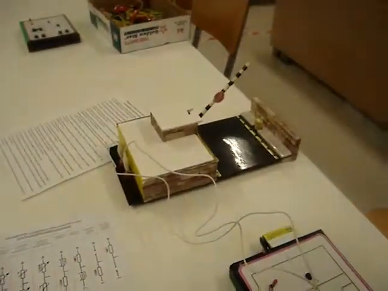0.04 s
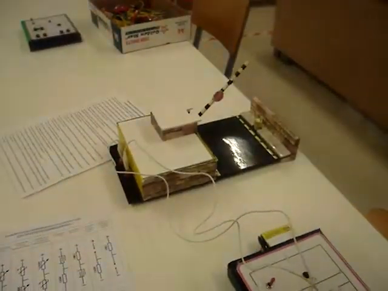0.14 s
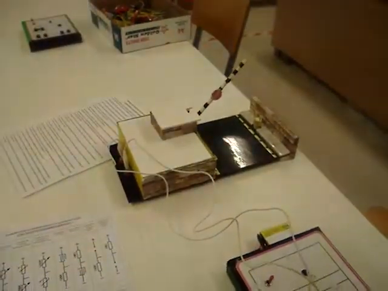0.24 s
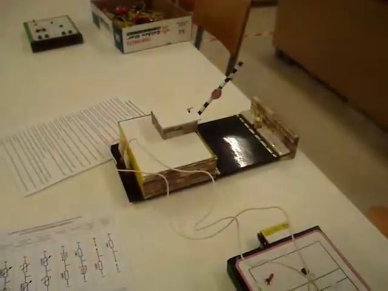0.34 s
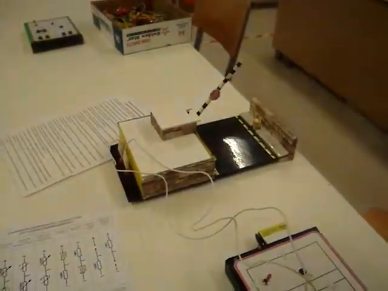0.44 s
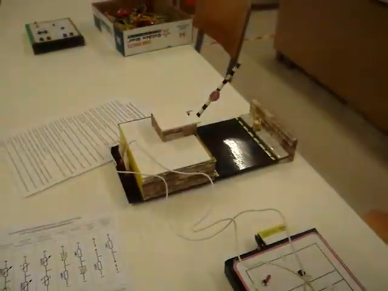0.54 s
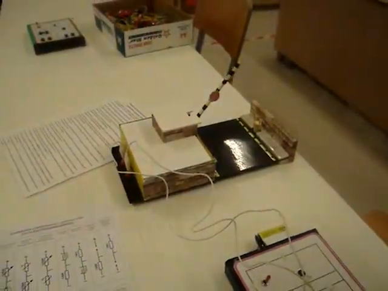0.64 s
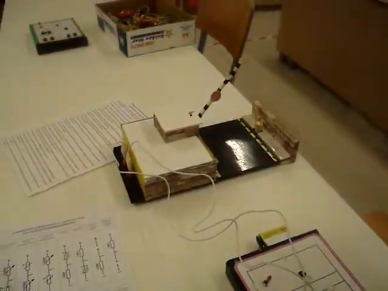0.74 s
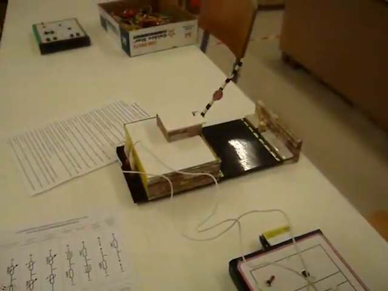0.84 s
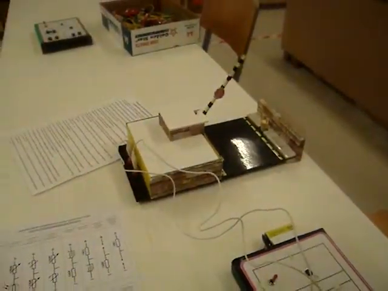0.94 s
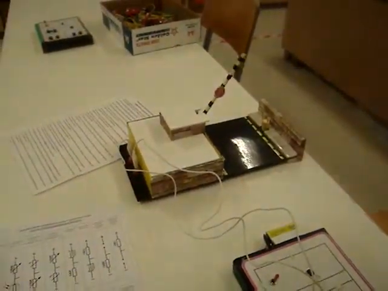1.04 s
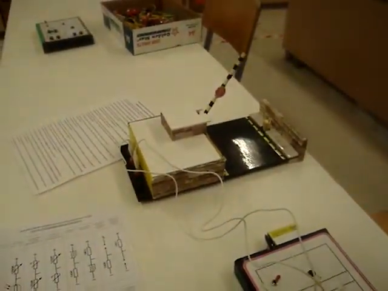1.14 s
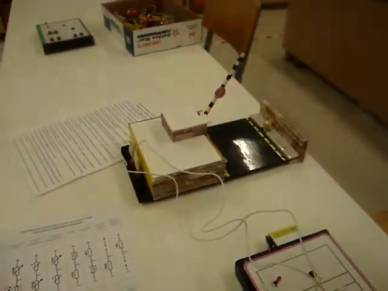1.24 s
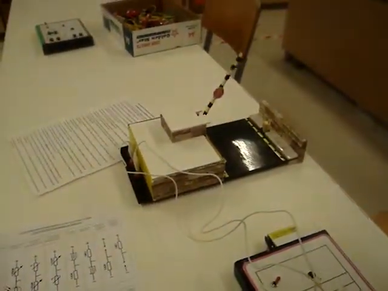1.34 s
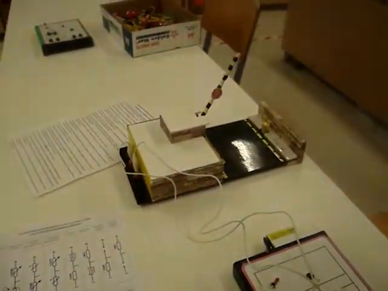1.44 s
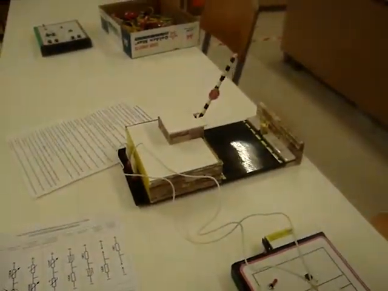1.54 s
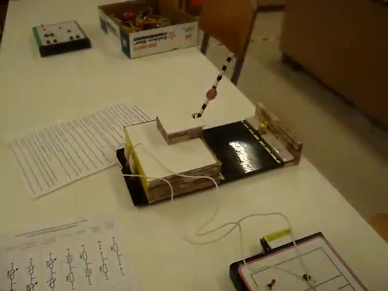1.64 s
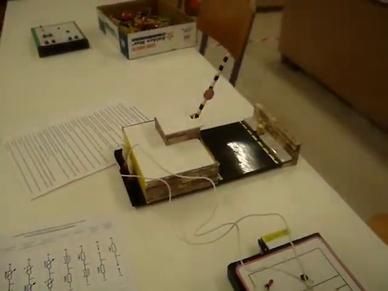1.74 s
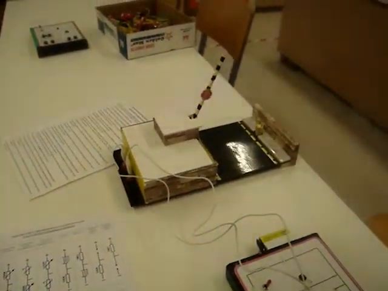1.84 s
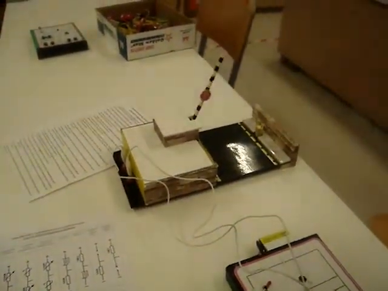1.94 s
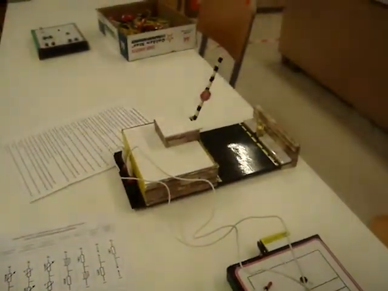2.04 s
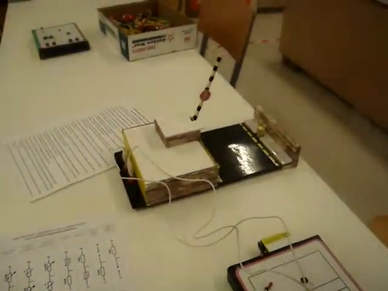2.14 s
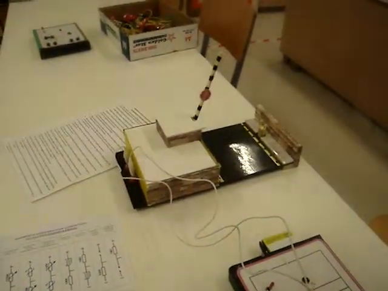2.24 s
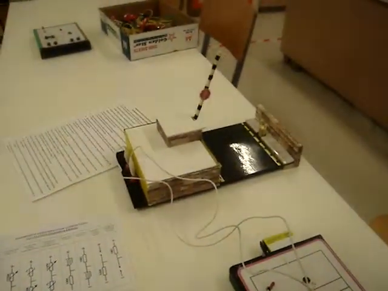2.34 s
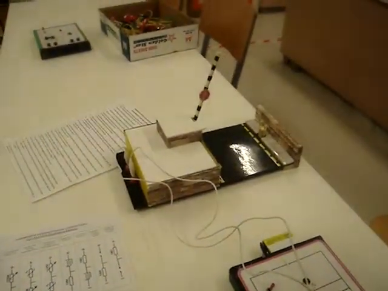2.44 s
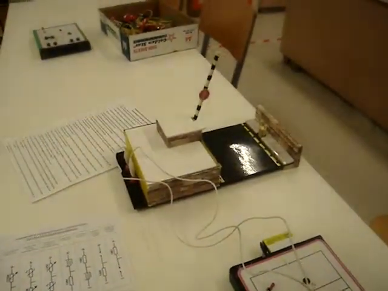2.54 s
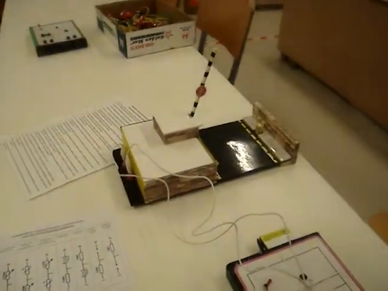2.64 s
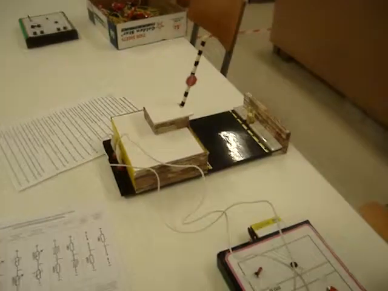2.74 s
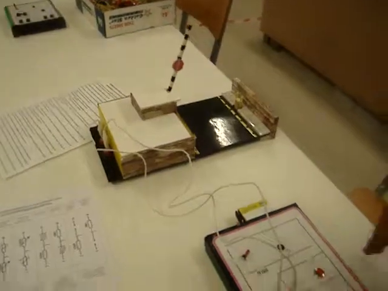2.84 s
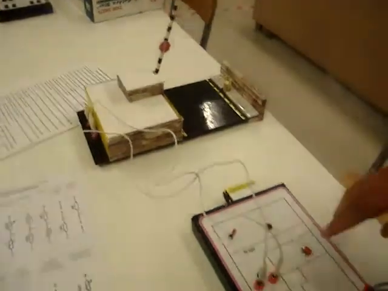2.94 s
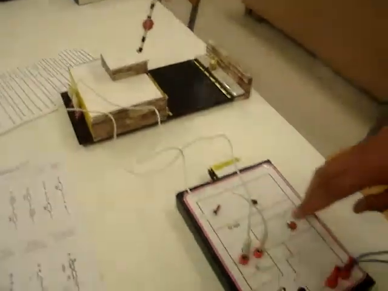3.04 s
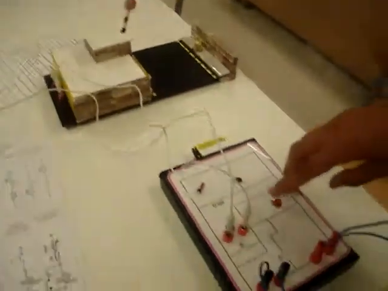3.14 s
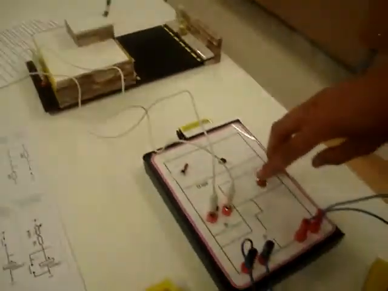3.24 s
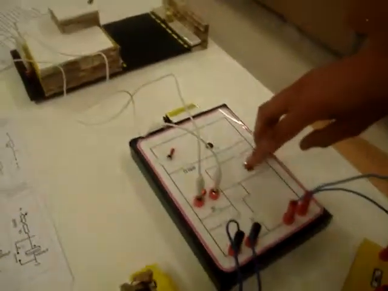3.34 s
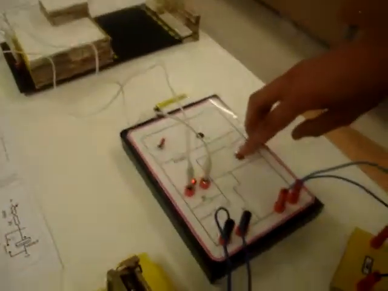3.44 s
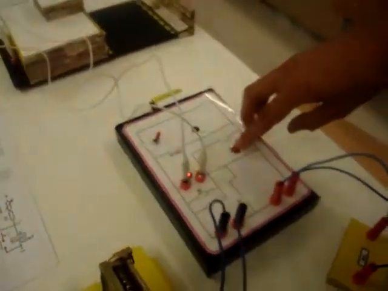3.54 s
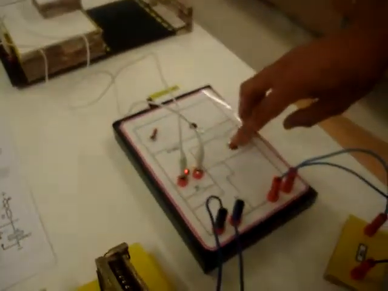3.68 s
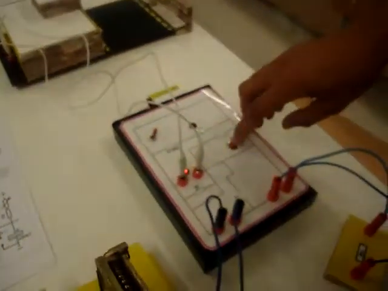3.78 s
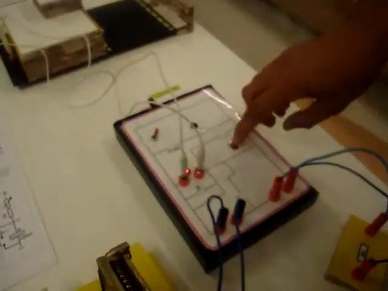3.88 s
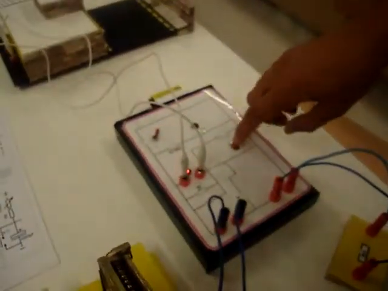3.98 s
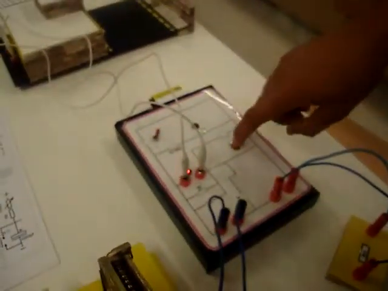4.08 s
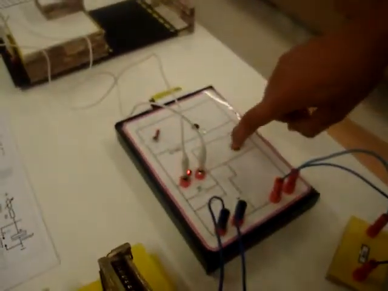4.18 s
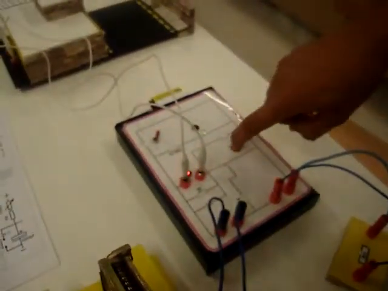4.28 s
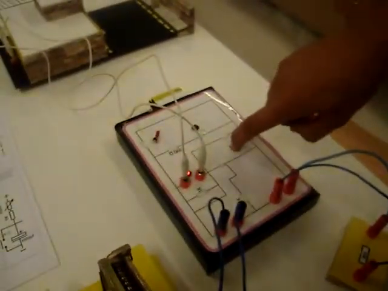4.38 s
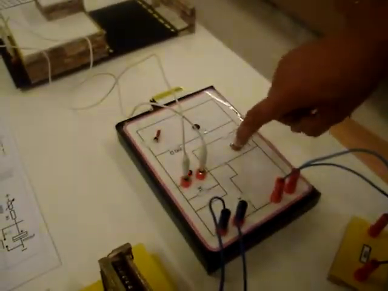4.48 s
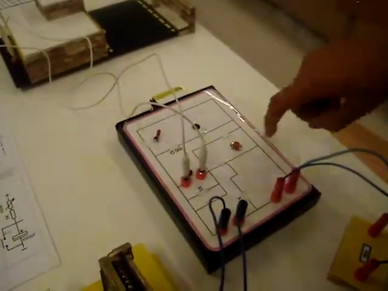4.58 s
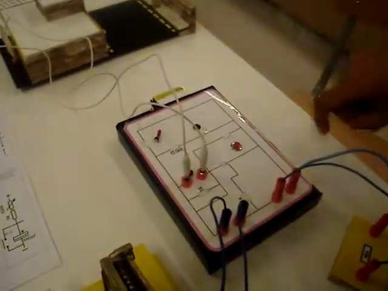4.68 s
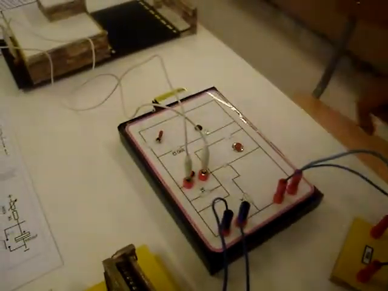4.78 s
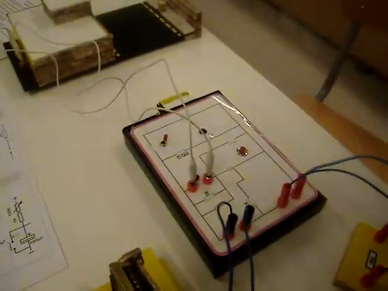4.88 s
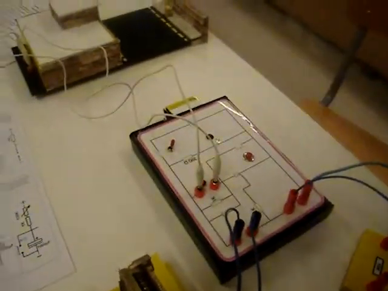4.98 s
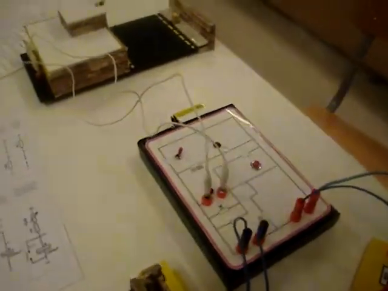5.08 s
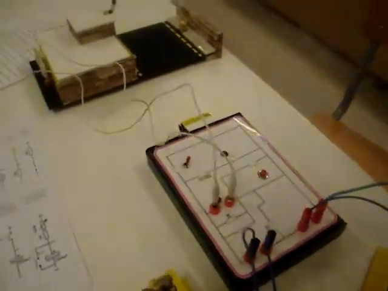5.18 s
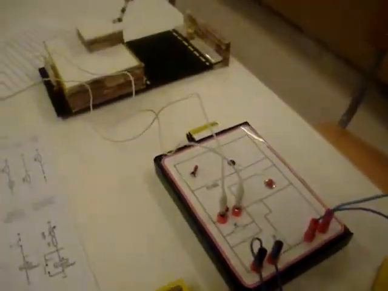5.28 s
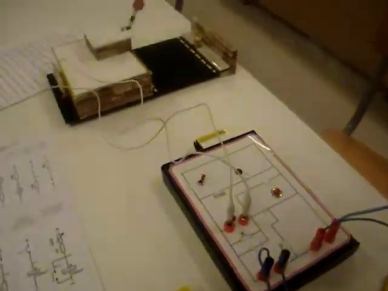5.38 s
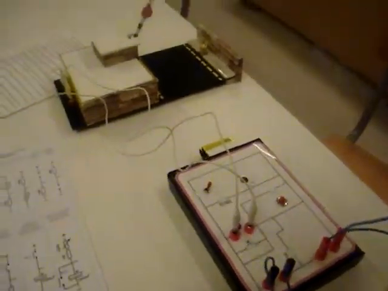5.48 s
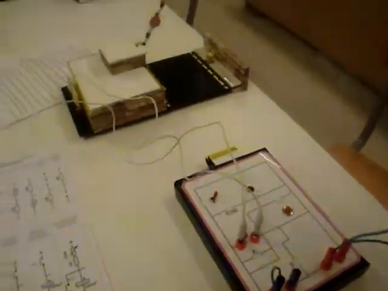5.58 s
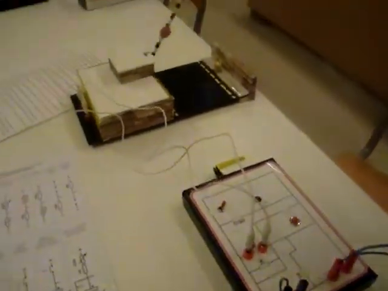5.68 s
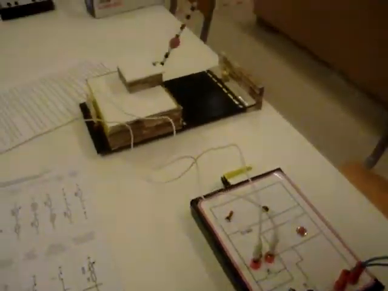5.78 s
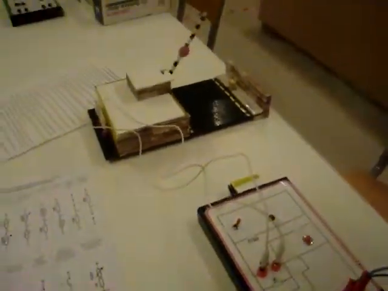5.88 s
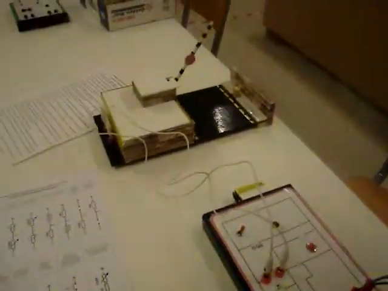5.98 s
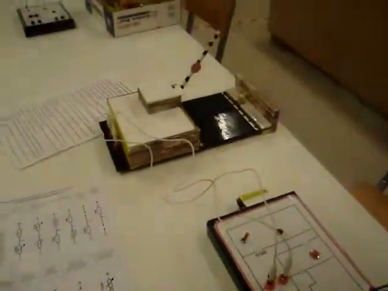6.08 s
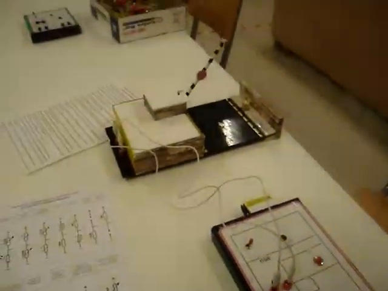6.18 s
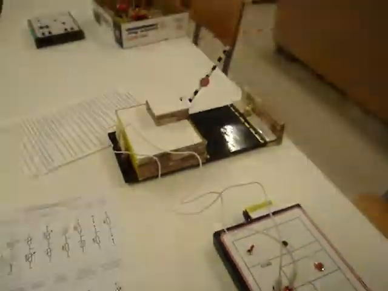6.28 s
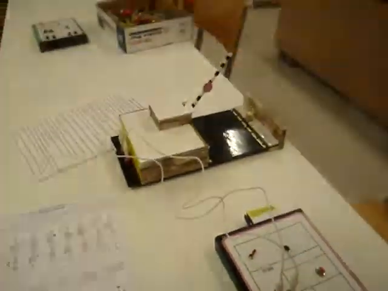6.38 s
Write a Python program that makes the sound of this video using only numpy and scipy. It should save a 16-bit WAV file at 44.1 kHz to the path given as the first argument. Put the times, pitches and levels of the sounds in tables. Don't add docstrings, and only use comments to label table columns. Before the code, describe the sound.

From 0 s a small geared motor is already running close by: a gritty, rapid whirr, rattling about a hundred times a second, with a thin clean whine and hard irregular tooth clicks. From about 1.5 to 2.1 s it labours, dipping slightly in pitch as clicks crowd together; faint low case bumps occur at 1.5 and 2.2 s. At 2.4 s power goes and it coasts down, silent by 2.7 s. Quiet ventilation, mains hum and a soft airy whistle remain. A sleeve rustles at 2.8 s and 3.6 s, with small ticks around 3 s. Soft fingertip taps begin at 4.03 s; a relay chatters and clacks twice around 4.2 s, echoing in the classroom. At 4.55 s it chatters and clacks again, and the motor spins up quickly, whirring with slight brush hiss, a bright tick near 4.96 s and sparser tooth clicks until cut off around 6.4 s.

```python
import sys
import numpy as np
from scipy import signal
from scipy.fft import rfft, irfft
from scipy.io import wavfile
from scipy.ndimage import minimum_filter1d

SR = 44100
rng = np.random.default_rng(int(sys.argv[2]) if len(sys.argv) > 2 else 0)


def to_wav(sig):
    pcm = np.clip(np.atleast_2d(sig), -1, 1) * 32767
    pcm = np.round(pcm).astype(np.int16)
    wavfile.write(sys.argv[1], SR, pcm.T)


def rack_gain(trim_db):
    fader = np.asarray(trim_db, float)
    return 10 ** (fader / 20)


N = 283122

FREE_SPEED = 98.0425
REVERSED_S = 3.5

# [t/s, peak level/dB]
BLOWS = [(0.0667, -15.5), (0.2593, -16.5), (0.3616, -14), (0.4733, -14.5), (0.625, -14.5), (0.8649, -12.5),
         (0.9787, -12), (1.3703, -13.5), (1.4207, -11.5), (1.6237, -14.5), (1.7399, -16.5), (1.8033, -19.5),
         (1.8332, -13.5), (1.9001, -16), (1.943, -11), (1.9759, -18.5), (1.9959, -30.5), (2.0492, -20),
         (2.0996, -19.5), (2.1415, -17.5), (2.2014, -10), (2.3491, -14.5), (4.729, -21), (4.9221, -16.5),
         (4.9899, -18), (5.4589, -27.5), (5.5222, -18), (6.1553, -17.5), (6.1892, -17.5), (6.3299, -16)]


def rms_one(x):
    return x / np.sqrt(np.mean(x ** 2) + 1e-20)


def in_time(rows):
    s, *columns = np.transpose(rows)
    return [np.interp(np.arange(N) / SR, s, c) for c in columns]


def band(x, low_hz, high_hz, order=2):
    return signal.sosfilt(signal.butter(order, [low_hz, high_hz], "band", fs=SR, output="sos"), x)


def resonances(x, modes):
    out = 0
    for k, (hz, width_hz, db) in enumerate(modes):
        r = np.exp(-np.pi * width_hz / SR)
        a = [1, -2 * r * np.cos(2 * np.pi * hz / SR), r * r]
        out = out + (-1) ** k * rack_gain(db) * signal.lfilter([(1 - r * r) / 2, 0, (r * r - 1) / 2], a, x)
    return out


def drift(rate_hz):
    r = np.exp(-2 * np.pi * rate_hz / SR)
    return rms_one(signal.lfilter([1], [1, -2 * r, r * r], rng.standard_normal(N + SR))[SR:])


def add(out, s, sound):
    i = round(s * SR)
    out[i:i + len(sound)] += sound[:N - i]


def speed_curve():
    # [t/s, speed/turns per s]
    lift_speed = [(0, 98.92), (1.2, 99.07), (1.55, 99.47), (1.65, 95.63), (1.8, 93.08), (1.95, 93.12),
                  (2.1, 97.63), (2.42, 94.45)]
    coast_loss = 370
    restart_s, rotor_s, arm_s, arm_shortfall = 4.55, .05936, .41024, 10.893
    t = np.arange(N) / SR
    coasting = np.maximum(t - lift_speed[-1][0], 0)
    lift = np.maximum(in_time(lift_speed)[0] - coast_loss * coasting, 0)
    since = np.maximum(t - restart_s, 0)
    lower = FREE_SPEED - arm_shortfall * np.exp(-since / arm_s)
    lower -= (FREE_SPEED - arm_shortfall) * np.exp(-since / rotor_s)
    return np.where(t > REVERSED_S, lower, lift)


def shaft():
    lowering, speed = np.arange(N) > REVERSED_S * SR, speed_curve()
    lift_turns = .11 + np.cumsum(speed) / SR
    lower_turns = 285.874 + np.cumsum(speed * lowering) / SR
    return np.where(lowering, lower_turns, lift_turns), lowering


def drive_curves():
    # [t/s, rattle level/dB, share of rattle bunched once a turn/0-1]
    gear_load = [
        [(0, -27.5, 0.3), (1.1, -28.5, 0.37), (1.5, -29, 0.49), (2, -30.5, 0.46), (2.22, -28, 0.39),
         (2.38, -31, .5), (2.5, -37, .6), (2.62, -54.5, 1)],
        [(4.562, -42, .2), (4.605, -39, .25), (4.635, -36.5, .5), (4.68, -32.5, 0.36), (4.9, -29, 0.34),
         (5.3, -30.5, 0.36), (6.42, -29.5, 0.26)],
    ]
    lift, lower = gear_load
    rest = [(lift[-1][0] + 0.097, -90, lift[-1][2]), (lower[0][0] - .02, -90, lower[0][2])]
    level_db, bunched = in_time(list(lift) + rest + list(lower))
    slow = 1 - speed_curve() / FREE_SPEED
    box_db, lid_db, shell_db = -3.5 - 3 * slow, -5.5 + 6.5 * slow, -9.5 - 13.5 * slow
    return level_db, box_db, lid_db, shell_db, bunched


def runout_db(turn):
    labours_s, laboured_share = 1.55, 0.35
    count = np.arange(turn[-1] + 1)
    laboured = (count > turn[round(labours_s * SR)]) & (count <= turn[round(REVERSED_S * SR) - 1])
    depth_db = 3 * np.where(laboured, laboured_share, 1)
    return depth_db * np.cos(2 * np.pi * (count - 1.5) / 5)


def rebounds_db(turn):
    slack_db, rebound_db, rebound_turns = -6, 4, 2.5
    blow_turn = turn[(np.array(BLOWS)[:, 0] * SR).astype(int) + 100]
    since = np.arange(turn[-1] + 1)[:, None] - blow_turn
    after = np.where(since > 0, rebound_db * np.exp(-np.maximum(since - 1, 0) / rebound_turns), 0)
    return after.max(axis=1) + slack_db * (since == -1).any(axis=1)


def gears():
    # [f/Hz, width/Hz, level/dB]
    box_modes = [(341, 19.4, -11), (437.7, 38.7, -10), (516, 38, -1.5), (575, 25, 0), (805, 131, -0.5),
                 (902, 253, -1), (1183, 273, -3.5)]
    case_modes = [(2805, 296, -3.5), (3139, 310, 3), (3304, 275, 0.5), (3561, 266, -9), (3822, 156, -8.5),
                  (4480, 780, -17)]
    shell_modes = [(5000, 680, 4), (6320, 590, 8.5), (6840, 616, 8.5), (7820, 2170, -4.5),
                   (9610, 800, -13.5), (10400, 680, -36)]
    lid_modes = [(1601, 69, 3), (1775, 90, 1.5), (2030, 310, -3), (2178, 55, 5), (2366, 320, -2)]
    turns, _ = shaft()
    level_db, box_db, lid_db, shell_db, bunched = drive_curves()
    turn = np.floor(turns + 0.24).astype(int)
    since = turns + 0.23 - turn
    rise_or_fall = np.where(since < .25, .11, .2)
    burst = rms_one(np.exp(-((since - .25) / rise_or_fall) ** 2))

    strength_db = 1.3 * rng.standard_normal((turn[-1] + 1, 3))
    strength_db += (runout_db(turn) + rebounds_db(turn))[:, None]
    strength_db[:, 1] = .8 * strength_db[:, 0] + .5 * strength_db[:, 1]

    bunched = np.clip(bunched, 0, 1)
    noise = rng.standard_normal((4, N))
    crisp = np.clip([bunched + .1, bunched + .25], 0, .95)
    sharp = noise[:2] * (crisp * burst * rack_gain(strength_db[turn, :2].T) + 1 - crisp)
    soft_level = 0.78 * bunched * burst * rack_gain(.5 * strength_db[turn, 2]) + 0.45
    soft = noise[2:] * soft_level * rack_gain(1.35 * drift(27.0))

    case = rms_one(band(resonances(sharp[0], case_modes), 2670, 5350))
    box = rack_gain(box_db) * rms_one(band(resonances(soft[0], box_modes), 321, 2250))
    lid = rack_gain(lid_db) * rms_one(band(resonances(soft[1], lid_modes), 1100, 3030))
    shell = rack_gain(shell_db) * rms_one(band(resonances(sharp[1], shell_modes), 4800, 10000))
    return rack_gain(level_db - 1.5) * (case + box + lid + shell)


def tooth_blows():
    out, push = np.zeros(N), np.exp(-(np.arange(700) / 20.) ** 2)
    for (s, db), chance in zip(BLOWS, rng.uniform(-1.3, 1, (len(BLOWS), 3))):
        case = (3100 + 90 * chance[0], 320, db + 0.35)
        shell = (6500 + 250 * chance[1], 600, db - 11 - 3.5 * chance[2])
        for hz, width_hz, peak_db in (case, shell):
            mode = [(hz, width_hz, 0)]
            ring = resonances(resonances(push * rng.standard_normal(700), mode), mode)
            add(out, s - .0006, rack_gain(peak_db) * ring / np.abs(ring).max())
    return out


def whine():
    shaft_orders = [1, 2, 3, 6, 8, 9, 11, 12, 20, 21, 24, 27, 32, 39]
    # [lifting level/dB, lowering level/dB]
    order_levels = [(-62, -62), (-63, -68), (-63, -66), (-48, -43), (-51, -60), (-46, -60), (-50, -45),
                    (-47, -48), (-49, -55), (-49, -60), (-56, -44), (-50, -54), (-50, -44), (-56, -54)]
    # [t/s, level/dB]
    mesh_tone = [(0, -37), (.78, -36), (.86, -44), (1.4, -45), (1.6, -56), (6.42, -56)]
    # [level speeding up/dB, level at full speed/dB]
    brush_levels = [(-69, -69), (-68, -61), (-69, -63), (-61, -69), (-61, -60), (-68, -66), (-64, -67),
                    (-63, -77), (-65, -82), (-72, -86)]
    turns, lowering = shaft()
    speed = speed_curve()
    powered, settled = np.clip((speed - 80) / 12, 0, 1), np.clip((speed - 95) / 2.5, 0, 1)
    wobble = rack_gain(np.array([1.0 * drift(4), 2.5 * drift(6), 2.5 * drift(9)]))
    strained_db = -6 * np.clip((98.5 - speed) / 2, 0, 1)
    out = rack_gain(in_time(mesh_tone)[0]) * np.sin(20 * np.pi * turns)
    for k, (order, (lift_db, lower_db)) in enumerate(zip(shaft_orders, order_levels)):
        lifting_db = lift_db + strained_db * (order > 3)
        lowering_db = lower_db - 8 * (1 - settled) * (order in (1, 6, 24))
        level = wobble[k % 3] * rack_gain(np.where(lowering, lowering_db, lifting_db))
        out += level * np.sin(2 * np.pi * (order * turns + rng.random()))
    for k, (order, (early_db, late_db)) in enumerate(zip(range(80, 110, 3), brush_levels)):
        level = lowering * wobble[1 + k % 2] * rack_gain(early_db + settled * (late_db - early_db))
        out += wobble[k % 3] * level * np.sin(2 * np.pi * (order * turns + rng.random()))
    return np.sqrt(2) * powered * out


def room_levels():
    # [t/s, half length/s, rustle rise/dB, air rise/dB]
    moves = [
        (2.822, 0.21, 19.5, 2.5),
        (3.097, 0.19, 3, 3.5),
        (3.638, 0.19, 16, -1),
        (4.096, 0.048, 7.5, 0),
    ]
    t, motor_db = np.arange(N) / SR, drive_curves()[0]
    rustle_db, air_db = sum(np.exp(-((t - s) / half_s) ** 2) * np.array([[rustle], [air]])
                            for s, half_s, rustle, air in moves)
    air_db = 20 * np.log10(rack_gain(-56.5 + air_db) + rack_gain(motor_db - 20))
    rumble_db = 20 * np.log10(rack_gain(-80.5) + rack_gain(motor_db - 47))
    whistle_db = -69 + 11.5 * np.interp(t, [2.55, 3, 3.6, 4.2], [0, 1, 1, 0])
    return air_db, whistle_db, rumble_db, -83 + rustle_db


def room_tone():
    # [f/Hz, level/dB per Hz]
    air_spectrum = [(25, -26), (70, -31.5), (120, -12), (200, -13), (300, -6), (450, -8.5), (700, -5.5),
                    (1300, -9), (2000, -12), (4000, -15.5), (7500, -16), (8200, -18.5), (9000, -23),
                    (10500, -22)]
    # [f/Hz, rms level/dB]
    hum_tones = [(100, -82), (199, -75), (301, -72), (399, -65), (500, -64.5), (602, -73), (801, -71),
                 (4500, -83), (7880, -78), (8129, -75.5)]
    air_db, whistle_db, rumble_db, rustle_db = room_levels()
    hz, white = np.fft.rfftfreq(N, 1 / SR) + 1, rng.standard_normal((4, N))
    air_hz, colour_db = np.transpose(air_spectrum)
    colour = rack_gain(np.interp(np.log(hz), np.log(air_hz), colour_db))
    air = rms_one(irfft(colour * rfft(white[0]), N))
    whistle = rms_one(resonances(resonances(white[1], [(1380, 130, 0)]), [(1400, 130, 0)]))
    rumble = rms_one(band(white[2], 48, 70)) * rack_gain(rumble_db)
    rustle = rms_one(band(white[3], 2600, 6400, order=4)) * rack_gain(rustle_db + 2.0 * drift(25))
    t, hum = np.arange(N) / SR, 0
    for tone_hz, db in hum_tones:
        tone = np.sin(2 * np.pi * (tone_hz * t + rng.random()))
        hum = hum + rack_gain(db + drift(3)) * np.sqrt(2) * tone
    return rack_gain(air_db) * air + rack_gain(whistle_db) * whistle + rumble + rustle + hum


def touches():
    # [t/s, peak level/dB, f/Hz, t60/s]
    taps = [
        (4.033, -45, 380, 0.021),
        (4.09, -46, 393, 0.03),
        (4.109, -50, 392, 0.027),
        (4.154, -47, 404, 0.04),
        (4.175, -36, 455, 0.026),
        (4.524, -43, 400, .03),
        (1.529, -36.5, 30, 0.029),
        (2.209, -39, 30, 0.029),
        (3.62, -62, 106.4, 0.13),
    ]
    # [t/s, peak level/dB, low f/Hz, high f/Hz]
    ticks = [
        (2.907, -30.5, 2200, 4600),
        (3.066, -38.5, 2000, 6900),
        (4.96, -12, 6900, 7800),
    ]
    out, t = np.zeros(N), np.arange(5000) / SR
    for s, db, hz, t60 in taps:
        shape = rack_gain(db - 60 * t / t60) * (1 - np.exp(-t / 0.0012))
        add(out, s, -2.5 * shape * np.cos(2 * np.pi * hz * t - .8))
    for s, db, low_hz, high_hz in ticks:
        noise = band(rng.standard_normal(900), low_hz, high_hz, order=3)
        add(out, s, rack_gain(db - 60 * t[:900] / 0.022) * noise)
    return out


def relay():
    # [f/Hz, width/Hz, level/dB]
    relay_modes = [(394, 380, -2.5), (826, 53, 7), (1010, 230, -2.5), (1576, 74, -1), (2180, 470, -3),
                   (4470, 400, 0), (5700, 910, -1.5), (6930, 1400, -0.5), (7920, 780, -3.5),
                   (9730, 1000, -31)]
    # [t/s, peak level/dB]
    clacks = [
        (4.198, -14),
        (4.2345, -14.5),
        (4.248, -26),
        (4.5605, -20.5),
    ]
    # [t/s, peak level/dB, length/s]
    chatters = [
        (4.175, -32, .004),
        (4.179, -23.5, .012),
        (4.208, -21, .011),
        (4.539, -22, .013),
    ]
    out, t = np.zeros(N), np.arange(1300) / SR
    clack = np.exp(-t / .0038) * rack_gain(2.5 * (t < .0002))
    rows = [(s, db, -6, 200, clack) for s, db in clacks]
    for s, db, length in chatters:
        held = np.exp(-(t / length) ** 4) * np.minimum(t / 0.00083, 1)
        rows.append((s, db, 5, 1100, held))
    for s, db, spring_db, low_hz, shape in rows:
        noise = band(rng.standard_normal(len(t)) * shape, low_hz, 12000, order=1)
        click = resonances(noise, relay_modes) + resonances(noise, [(2970, 150, spring_db)])
        add(out, s, rack_gain(db) * click / np.abs(click).max())
    return out


def brush_hiss():
    # [f/Hz, width/Hz, level/dB]
    hiss_modes = [(4550, 170, 0), (8900, 900, -11), (9300, 460, -13.5)]
    hiss, speed = rms_one(resonances(rng.standard_normal(N), hiss_modes)), speed_curve()
    pull_db = 4.0 * np.clip((FREE_SPEED - speed) / 4.0, 0, 1)
    level = rack_gain(-56 + pull_db + 1.4 * drift(15))
    return level * shaft()[1] * speed / FREE_SPEED * hiss


def classroom(x, onset_s):
    # [f/Hz, t60/s]
    echo_t60 = [(300, 0.37), (1500, 0.98), (4000, 0.36), (9000, 0.92)]
    t, tail = np.arange(SR) / SR, 0
    for low_hz in 140 * 2 ** np.arange(7.):
        t60 = np.interp(np.sqrt(2) * low_hz, *np.transpose(echo_t60))
        tail = tail + band(rng.standard_normal(SR), low_hz, 2 * low_hz) * rack_gain(-60 * t / t60)
    tail = tail * (1 - np.exp(-(t / onset_s) ** 2))
    return signal.fftconvolve(x, tail / np.sqrt(np.sum(tail ** 2)))[:N]


def scene():
    motor = gears() + tooth_blows()
    contacts = relay()
    wet = classroom(rack_gain(-6.5) * (motor + contacts), onset_s=0.024)
    return (motor + whine() + contacts + wet + touches() + room_tone() + brush_hiss())[None]


def starved_bands(x, margin_db, chance_db, depth_db):
    spec = signal.stft(x, nperseg=256)[2]
    steps = spec.shape[1] // 3 * 3
    for low in range(16, 60, 4):
        power = np.abs(spec[low:low + 4, :steps].reshape(4, -1, 3)) ** 2
        level_db = 10 * np.log10(np.mean(power, axis=(0, 2)) + 1e-16)
        near_db = -minimum_filter1d(-level_db, size=3)
        easy_db = np.interp(low, [16, 30, 44, 52], [8., 0, 0, 3])
        deficit_db = near_db - level_db + chance_db * rng.standard_normal(len(level_db))
        dropped = deficit_db > margin_db + easy_db
        spec[low:low + 4, :steps] *= np.repeat(np.where(dropped, rack_gain(-depth_db), 1), 3)
    return signal.istft(spec, nperseg=256)[1][:N]


def low_pass(x):
    return signal.sosfilt(signal.butter(12, 10040, fs=SR, output="sos"), x)


def record(dry):
    holed = starved_bands(dry[0], margin_db=5.6, chance_db=2.8, depth_db=30)[None]
    cut = signal.sosfilt(signal.ellip(10, .5, 45, 10050, fs=SR, output="sos"), holed)
    return low_pass(cut)


dry = scene()
out = record(dry)
to_wav(out)
```